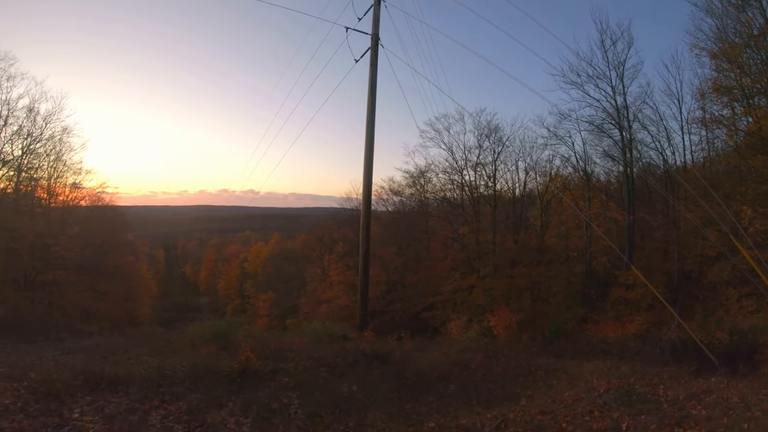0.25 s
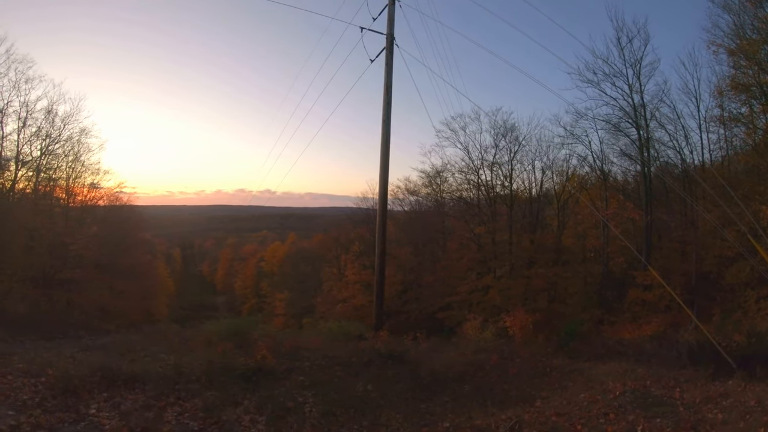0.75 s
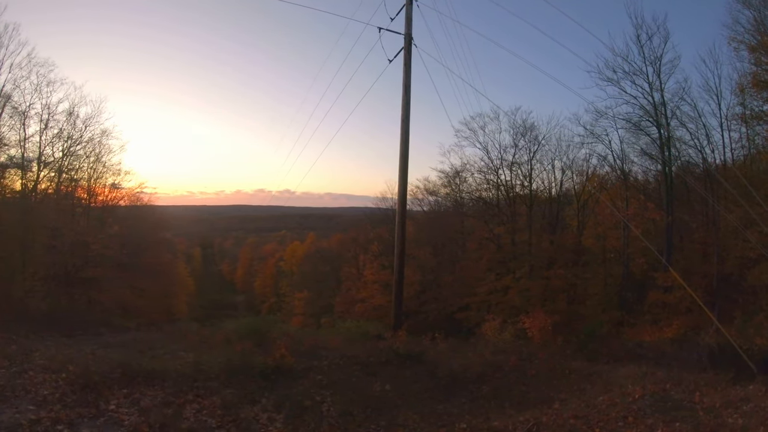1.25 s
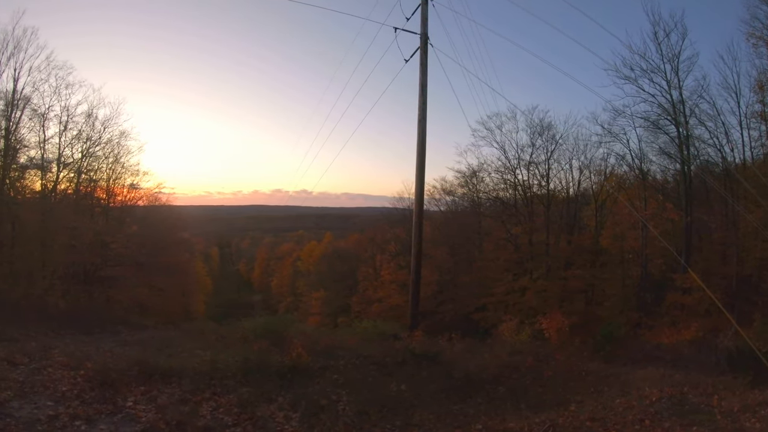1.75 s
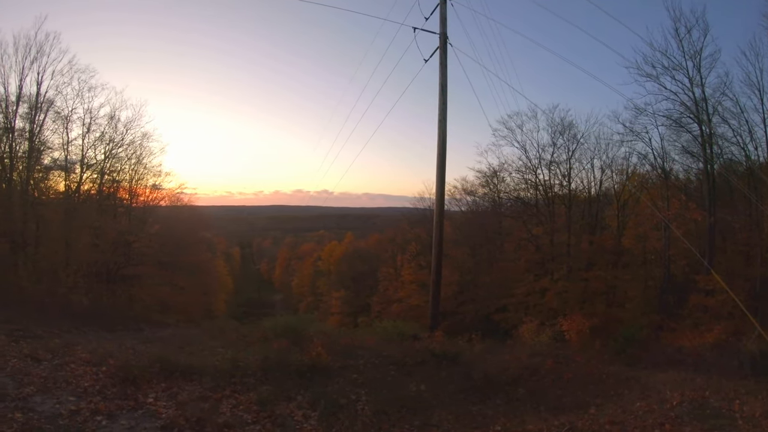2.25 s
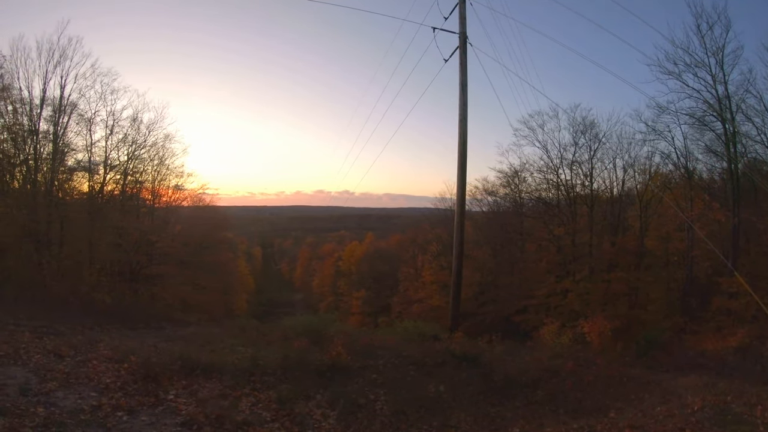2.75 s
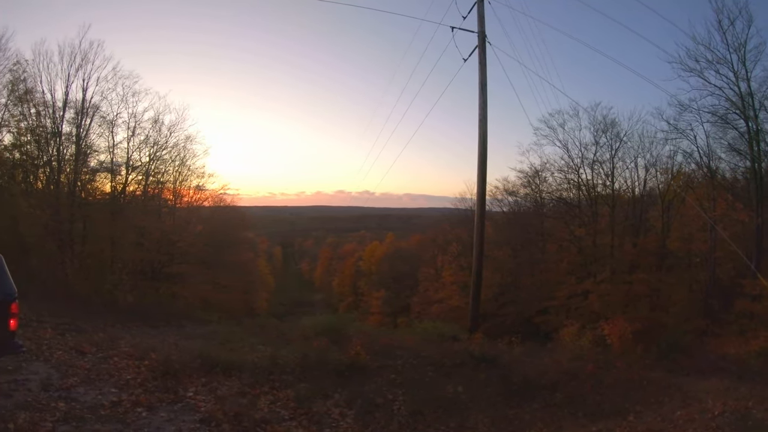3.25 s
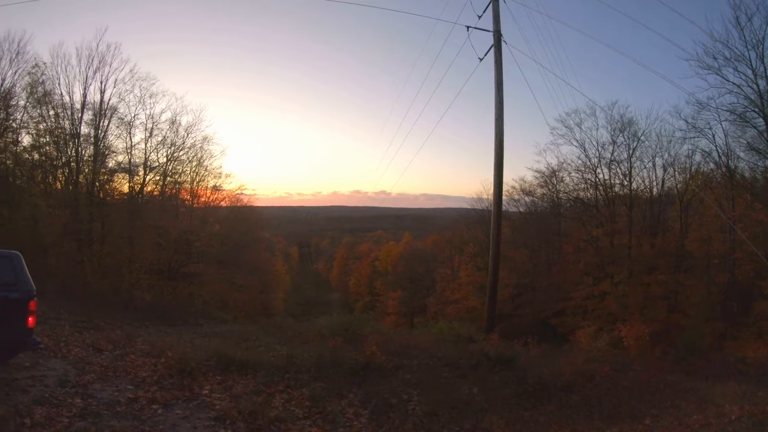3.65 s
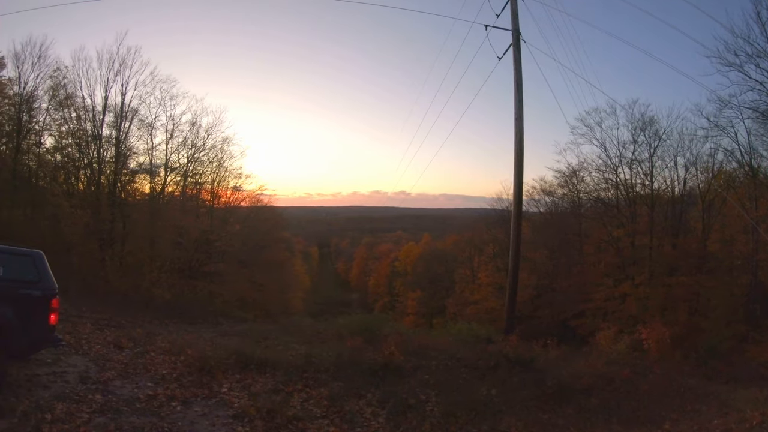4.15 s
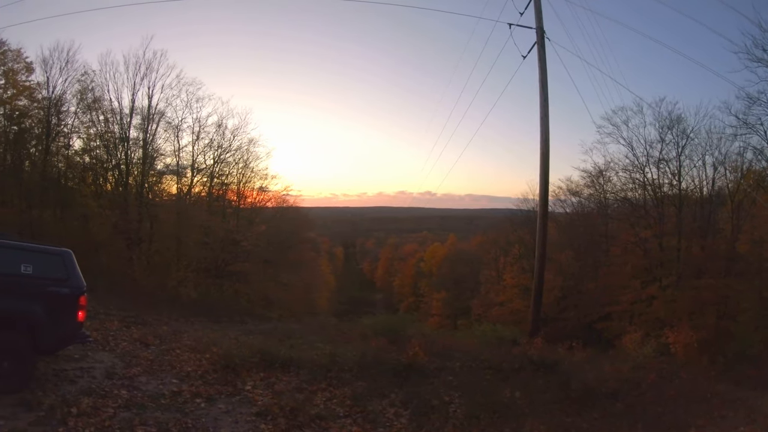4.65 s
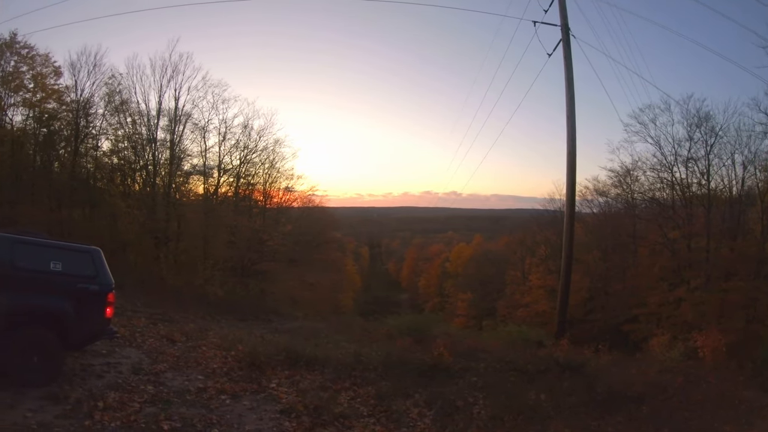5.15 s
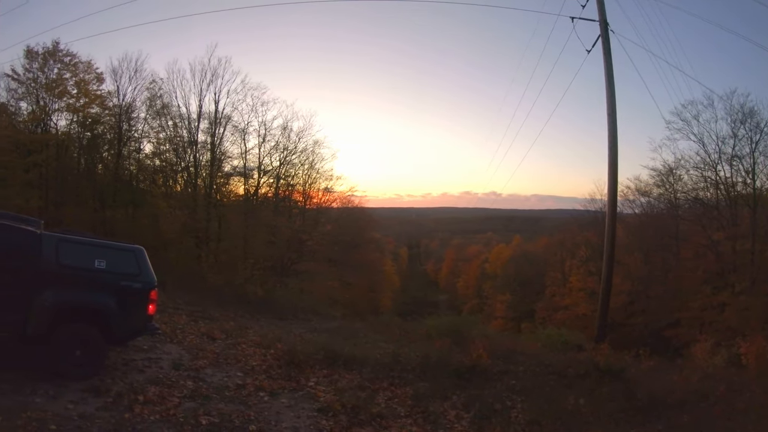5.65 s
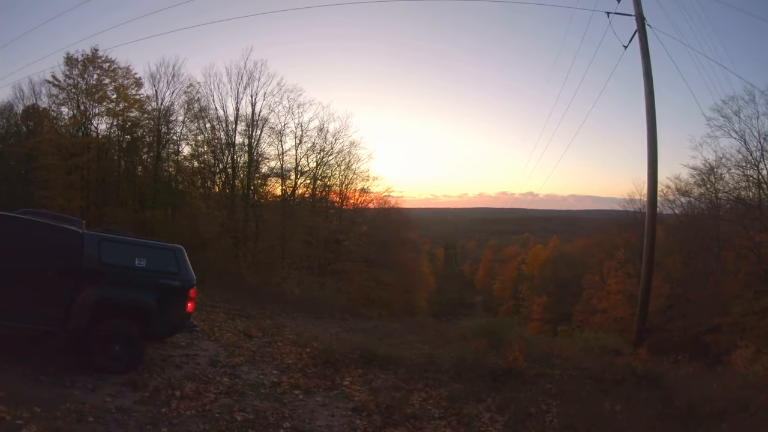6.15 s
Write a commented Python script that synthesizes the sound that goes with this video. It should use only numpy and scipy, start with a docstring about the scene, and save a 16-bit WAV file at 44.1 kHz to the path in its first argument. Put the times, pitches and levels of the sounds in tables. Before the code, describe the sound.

A parked pickup idles steadily in the open, its low exhaust thumping about fifteen times a second under a beating fan hum and faint airy hiss. A loose metal part chatters and knocks through the first four seconds, then mostly quiets. The handheld microphone catches soft wind rumble and dull handling bumps around 2.5 and 5.5 seconds.

```python
"""Idling V6 pickup outdoors

Harmonics of the crank rate sum to uneven exhaust thumps; harmonics of the fan rate beat as a hum.
Shaped noise gives the engine's rumble and wash and the intake hiss, with whistles from narrow resonators.
Random touches ring a loose metal part near 1 kHz, and harder knocks stand out from its chatter.
Light air and handling act on the hand-held microphone as rumble, gusts, soft bumps and sinking drones."""
import sys
import numpy as np
from scipy import signal
from scipy.fft import rfft, irfft
from scipy.io import wavfile

SR = 44100
rng = np.random.default_rng(int(sys.argv[2]) if len(sys.argv) > 2 else 0)


def store_pcm(level_fs):
    """Save levels as 16-bit WAV."""
    pcm = np.round(np.clip(level_fs, -1, 1) * 32767).astype(np.int16)
    wavfile.write(sys.argv[1], SR, np.atleast_2d(pcm).T)


N = 282240
T = np.arange(N) / SR  # time axis, s

# Crank rotation, hunting a little at idle: [t/s, crank rate/(turns per s)]
CRANK_RATE = [(0, 14.87), (.5, 14.93), (.9, 15.2), (1.35, 14.77), (2.45, 15.1), (3.15, 14.95), (3.47, 14.7),
              (3.9, 15.1), (5.65, 15.01), (6.4, 14.77)]
FIRST_THUMP_S = .056
# Exhaust harmonics, before the thump strength: [multiple of crank rate, rms level/dB]
EXHAUST_ORDERS = [(2, -62), (3, -61), (4, -63), (5, -51.3), (6, -49.8), (7, -54.2), (8, -50.5), (9, -56),
                  (10, -51.8), (11, -67), (12, -63), (13, -57.5), (14, -70)]
# Strength of the exhaust thumps: [t/s, relative level/dB]
THUMP_STRENGTH = [(0, -1), (1.6, -3.5), (2.0, -2.5), (2.4, -2.5), (3.0, -2.5), (3.55, -2.3), (4.3, -1),
                  (4.7, -2.3), (5.2, 1.2), (5.9, -0.8), (6.4, -2)]

# Harmonics of a fan with unevenly spaced blades, before the hum level: [multiple of fan rate, rms level/dB]
FAN_ORDERS = [(2, -60.5), (3, -60), (4, -62), (5, -57), (6, -56), (9, -65), (10, -64.5), (12, -69),
              (13, -51.3), (14, -52.4), (15, -68), (16, -72), (17, -70.5)]
PULLEY_RATIO = 1.167  # fan turns per crank turn
# Belt slip of the fan against the crank: [t/s, lead/turns of the fan]
FAN_LEAD_TURNS = [(0, .25), (.8, .35), (1.85, .39), (2.25, .37), (2.7, .41), (3.35, .355), (3.85, .365),
                  (4.95, .205), (5.8, .2), (6.4, .335)]
# Strength of the fan's hum: [t/s, relative level/dB]
FAN_HUM_LEVEL = [(0, -3.5), (1.1, -0.1), (3, -1.5), (4.6, 0), (5.5, -1.5), (6.4, 1)]
# Whines of the belt-driven accessories: [multiple of crank rate, rms level before flutter/dB]
ACCESSORY_WHINES = [(42, -74.5), (99.3, -84), (132.6, -100), (168.5, -94)]

# Noise spectrum of the engine block: [f/Hz, level/dB per Hz]
BLOCK_SPECTRUM = [(15, -82.5), (35, -78.5), (70, -72), (120, -70.5), (170, -70), (205, -73.5), (245, -73.5),
                  (285, -73.5), (330, -79.5), (400, -89), (600, -115)]
# Noise spectrum of the engine bay, before its throb: [f/Hz, level/dB per Hz]
BAY_SPECTRUM = [(250, -101), (400, -88.5), (500, -83), (620, -86.5), (830, -85), (950, -89), (1130, -88),
                (1330, -100.5), (1500, -96.5), (1900, -103), (2500, -108), (3500, -116), (6000, -135)]

# Noise spectrum of the intake hiss, before chopping and facing: [f/Hz, level/dB per Hz]
HISS_SPECTRUM = [(1500, -118), (2600, -113), (3550, -113), (3850, -105), (4200, -105.5), (4750, -105.5),
                 (5400, -112), (7000, -123), (8500, -124), (10000, -138), (12500, -131), (15000, -139)]
# Intake whistles, before wavering, chopping and facing: [f/Hz, bandwidth/Hz, rms level/dB]
INTAKE_WHISTLES = [(3707, 5, -88.7), (3771, 12, -86.3), (3812, 12, -90), (3862, 26, -83.8)]
CHOP_LEAD_TURNS = .19  # the hiss peaks just before each beat of the hum
DUCT_BAND_HZ = (3400, 5400)  # the band in which the intake duct resonates
# The hiss is directional and steps up by FACING_DB as the microphone turns to face the truck
FACING_S, TURN_S, FACING_DB = 3.1, 0.2, 1.0

# Modes of the loose metal part: [f/Hz, relative level/dB, decay time t60/s]
LOOSE_PART_MODES = [(813, -2, 0.025), (975, 0.5, 0.032), (1032, 2.5, 0.032), (1115, -1.5, 0.028),
                    (1500, -19.5, 0.06)]
# Bouts of chatter: [t at full level/s, hold length/s, level/dB]
CHATTER_BOUTS = [(0.464, 0.14, -55.5), (0.697, 0.41, -59), (1.314, 0.15, -58.5), (1.55, 0.052, -61),
                 (1.846, 0.46, -65.5), (2.403, 0.34, -61.5), (2.808, 0.44, -59), (3.342, 0.5, -57.5),
                 (3.996, 0.041, -59.5), (5.56, 0.15, -63.5)]
BOUT_ATTACK_S, BOUT_RELEASE_S = 0.012, 0.058
CHATTER_REST_DB = -67.5  # it never quite settles between bouts
# The shaking that bunches the chatter: multiples of the crank rate, and depth 0-1
SHAKE_ORDERS, SHAKE_DEPTH = (1.56, 2.68), .65
# Harder knocks of the loose part: [t half a rise before the peak/s, envelope peak level/dB, f/Hz]
HARD_KNOCKS = [(0.436, -45, 990), (0.466, -43.5, 1026), (0.508, -49, 1000), (0.671, -48, 1000),
               (.857, -56, 1030), (0.898, -50, 1005), (1.022, -45, 1070), (1.298, -47.5, 1030),
               (1.363, -45, 1050), (1.429, -54, 1030), (1.66, -45.5, 1035), (2.429, -47, 1040),
               (2.783, -48, 1080), (2.834, -45.5, 1000), (3.051, -42, 1000), (3.134, -46.5, 1070),
               (3.178, -39, 1020), (3.229, -50, 1040), (3.353, -47, 1025), (3.516, -48, 1024),
               (3.627, -51, 1040), (3.659, -47, 1060), (3.77, -46, 1060), (4.087, -51, 1010)]
# Noise colour of a knock's scuff: [f/Hz, relative level/dB per Hz]
SCUFF_COLOUR = [(450, -13), (650, 9.5), (1100, -1.5), (1350, -24.5), (2500, -32)]

# Soft bumps on the microphone housing: [t at the peak/s, peak level/dB, f/Hz, rise/cycles]
HOUSING_BUMPS = [(2.462, -33, 156, 0.58), (2.493, -35, 150, 0.85), (2.554, -28, 253, 1.34),
                 (2.556, -26, 91, 0.42), (2.565, -33.5, 330, .6), (2.572, -30, 68, 0.88),
                 (2.583, -29.5, 101, .7), (2.659, -35, 125, 0.46), (2.986, -32, 157, 0.82),
                 (5.357, -27.5, 165, 0.59), (5.417, -33, 280, 0.5), (5.425, -37, 230, 0.99),
                 (5.441, -29.5, 150, 0.73), (5.473, -32.5, 268, 1), (5.481, -33, 290, 0.51),
                 (5.507, -31.5, 280, 0.65), (5.515, -28, 90, 0.48), (5.53, -38, 160, 0.56),
                 (5.547, -37, 238, 1.0), (5.586, -35.5, 160, 0.85), (5.591, -34, 100, 0.92),
                 (5.861, -41, 110, 0.48), (5.886, -31.5, 121, 0.45)]
# Hollow drones after the big jolts: [t at full level/s, hold length/s, level/dB]
HOLLOW_DRONES = [(2.58, .28, -46.5), (5.539, .4, -48)]
DRONE_FROM_HZ, DRONE_TO_HZ, DRONE_SINK_S, DRONE_WIDTH_HZ = 255, 152, .13, 17.7

# Gusts on the microphone: [t at the peak/s, rise/s, fall/s, buffeting level/dB, deep rumble level/dB]
WIND_GUSTS = [(.45, 0.11, 0.25, -54, -50), (1.55, .2, 0.21, -52, -48), (2.23, 0.11, 0.074, -59, -42.5),
              (2.56, 0.093, 0.065, -51, -40), (2.79, 0.1, 0.15, -50.5, -57.5),
              (3.95, 0.26, 0.15, -51, -44.5), (5.43, 0.16, 0.14, -43, -54), (5.53, 0.078, .08, -47, -50.5),
              (5.86, 0.048, 0.45, -50.5, -50)]
# Colour of the deep air rumble: [f/Hz, relative level/dB per Hz]
RUMBLE_COLOUR = [(10, -15.5), (20, -3.5), (32, -1), (55, -0.5), (90, 1), (150, -7.5), (300, -43.5),
                 (600, -68)]
# Colour of the higher buffeting: [f/Hz, relative level/dB per Hz]
BUFFET_COLOUR = [(30, -13), (70, 3.5), (140, 3), (210, 4), (290, 0.5), (380, -18), (520, -22.5), (900, -48)]
BREEZE_DB, BREEZE_SWING_DB, BREEZE_SWINGS_PER_S = -51, 0, 1  # steady, as the swing is 0

CUTOFF_HZ = 15200


def from_db(db):
    """Decibel definition: 20 dB is a tenfold amplitude."""
    return 10 ** (np.asarray(db) / 20)


def rms_one(x):
    """Normalisation to unit root mean square."""
    return x / np.sqrt(np.mean(x ** 2) + 1e-20)


def in_time(rows):
    """Linear interpolation of each column at every sample."""
    s, *columns = np.transpose(rows)
    return [np.interp(T, s, c) for c in columns]


def drift(rate_hz):
    """Low-pass filtering of white noise: a slow random wander of unit rms."""
    hz = np.arange(N // 2 + 1) * SR / N
    spectrum = rfft(rng.standard_normal(N)) / (1 + (hz / rate_hz) ** 4)
    return rms_one(irfft(spectrum, N))


def noise(spectrum):
    """Spectral shaping of white noise to a level per Hz, falling away beyond the table's ends."""
    hz = np.maximum(np.arange(N // 2 + 1) * SR / N, 1)
    at, level = np.transpose(spectrum)
    ends = np.minimum(1, np.minimum(hz / at[0], at[-1] / hz)) ** 2
    gain = from_db(np.interp(np.log(hz), np.log(at), level)) * ends
    return irfft(rfft(rng.standard_normal(N)) * gain, N) * np.sqrt(SR / 2)


def ring(drive, hz, t60):
    """Damped resonance: a unit click sets a decaying sine of height 1 ringing."""
    radius = np.exp(-np.log(1000) / (t60 * SR))
    w = 2 * np.pi * hz / SR
    feedback = [1, -2 * radius * np.cos(w), radius * radius]
    return signal.lfilter([0, np.sin(w)], feedback, drive + 1e-18)


def swell(age, rise_s):
    """Soft contact: the envelope grows to 1 after rise_s, then dies away."""
    u = np.maximum(age, 0) / rise_s
    return (u * np.exp(1 - u)) ** 2


def bout(start, length, attack_s, release_s):
    """Amplitude envelope: a linear attack ending at start, a hold at 1, an exponential release."""
    attack = np.clip((T - start) / attack_s + 1, 0, 1)
    return attack * np.exp(-np.maximum(T - start - length, 0) / release_s)


def gust(peak_s, rise_s, fall_s):
    """Exponential growth and decay: the envelope builds to 1 and ebbs."""
    return np.exp(-np.maximum((peak_s - T) / rise_s, (T - peak_s) / fall_s))


def exhaust(turns, thump_db, uneven_db, jitter_turns, smear):
    """Fourier synthesis of one uneven thump a turn; the muffler's dispersion smears the outer orders."""
    angle = 2 * np.pi * (turns + jitter_turns * drift(19.0))
    main_order = 7
    pulses = 0
    for k, db in EXHAUST_ORDERS:
        phase = smear * (k - main_order) ** 2
        pulses = pulses + from_db(db) * np.cos(round(k) * angle + phase)
    return np.sqrt(2) * pulses * from_db(thump_db + uneven_db * drift(2.2))


def fan(fan_turns, flutter_db, smear):
    """Beating of blade tones: the two strongest orders interfere once a fan turn as a beaded hum."""
    hum_db, = in_time(FAN_HUM_LEVEL)
    main_order = 13.5
    angle = 2 * np.pi * fan_turns
    tones = 0
    for k, db in FAN_ORDERS:
        phase = smear * (k - main_order) ** 2
        tones = tones + from_db(db + flutter_db * drift(4)) * np.cos(round(k) * angle + phase)
    return np.sqrt(2) * tones * from_db(hum_db)


def whines(turns, flutter_db):
    """Geared rotation: faint accessory tones keep fixed ratios to the crank rate."""
    tones = 0
    for k, db in ACCESSORY_WHINES:
        tones = tones + from_db(db + flutter_db * drift(3.0)) * np.sin(2 * np.pi * k * turns)
    return np.sqrt(2) * tones


def engine_bay(turns, heave, throb, flicker_db):
    """Amplitude modulation: block rumble heaves once a turn, brighter wash throbs with its three firings."""
    firing = np.cos(2 * np.pi * 3 * turns)
    wash = noise(BAY_SPECTRUM) * (1 + throb * firing) * from_db(flicker_db * drift(54))
    rumble = noise(BLOCK_SPECTRUM) * (1 + heave * np.cos(2 * np.pi * turns))
    return rumble + wash


def ground_echo(x, lag_s, echo_db):
    """Comb filtering: one weak, late reflection off the ground ripples the spectrum."""
    return x + from_db(echo_db) * np.interp(T - lag_s, T, x, left=0)


def intake(fan_turns, throb, waver_db):
    """Turbulence at the nearly shut throttle: hiss and whistles, their duct band chopped by the fan."""
    whistles = 0
    for hz, width, db in INTAKE_WHISTLES:
        t60 = np.log(1000) / (np.pi * width)  # bandwidth sets the decay
        level = from_db(db + waver_db * drift(3))
        whistles = whistles + level * rms_one(ring(rng.standard_normal(N), hz, t60))
    angle = 2 * np.pi * (fan_turns + CHOP_LEAD_TURNS)
    blades = np.cos(angle) - .45 * np.cos(3 * angle) + .25 * np.cos(4 * angle)
    hiss = noise(HISS_SPECTRUM) + whistles
    duct = signal.butter(2, DUCT_BAND_HZ, "band", fs=SR, output="sos")
    resonance = signal.sosfiltfilt(duct, hiss)
    facing_db = FACING_DB / 2 * np.tanh((T - FACING_S) / TURN_S)
    return (hiss + resonance * throb * blades) * from_db(facing_db)


def chatter(turns, per_s, spread_db):
    """Modal excitation by random touches: engine shaking bunches them, each strikes the modes differently."""
    shake = np.prod([1 + SHAKE_DEPTH * np.cos(2 * np.pi * k * turns) for k in SHAKE_ORDERS], axis=0)
    struck = rng.random(N) < shake * per_s / SR
    touches = struck * from_db(spread_db * np.clip(rng.standard_normal(N), -2, 2))
    rings = 0
    for hz, db, t60 in LOOSE_PART_MODES:
        rings = rings + from_db(db) * ring(touches * rng.standard_normal(N), hz, t60)
    levels = [from_db(db) * bout(s, length, BOUT_ATTACK_S, BOUT_RELEASE_S)
              for s, length, db in CHATTER_BOUTS]
    return rms_one(rings) * np.hypot(np.max(levels, axis=0), from_db(CHATTER_REST_DB))


def knocks(rise_s, scuff_db):
    """Gradual excitation: harder touches build over a few cycles near the main mode, with a rough scuff."""
    scuff = from_db(scuff_db) * rms_one(noise(SCUFF_COLOUR))
    out = 0
    for s, db, hz in HARD_KNOCKS:
        envelope = from_db(db) * swell(T - s + rise_s / 2, rise_s)
        out = out + envelope * (np.sin(2 * np.pi * hz * (T - s)) + scuff)
    return out


def bumps():
    """Damped impulse response: hand bumps on the housing, crisp or dull, last a few cycles in clusters."""
    out = 0
    for s, db, hz, cycles in HOUSING_BUMPS:
        rise_s = cycles / hz
        out = out + from_db(db) * swell(T - s + rise_s, rise_s) * np.cos(2 * np.pi * hz * (T - s))
    return out


def drones(attack_s, release_s):
    """Quadrature modulation of a gliding carrier: a narrow band of rumble sinks and levels off."""
    out = 0
    for s, length, db in HOLLOW_DRONES:
        sink = np.exp(-np.maximum(T - s, 0) / DRONE_SINK_S)
        hz = DRONE_TO_HZ + (DRONE_FROM_HZ - DRONE_TO_HZ) * sink
        angle = 2 * np.pi * np.cumsum(hz) / SR
        band = rms_one(drift(DRONE_WIDTH_HZ) * np.cos(angle) + drift(DRONE_WIDTH_HZ) * np.sin(angle))
        out = out + from_db(db) * bout(s, length, attack_s, release_s) * band
    return out


def buffeting():
    """Wind turbulence at the microphone: gusts lift the breeze's deep rumble and add higher buffeting."""
    buffet, rumble = 0, 0
    for s, rise_s, fall_s, buffet_db, rumble_db in WIND_GUSTS:
        shape = gust(s, rise_s, fall_s)
        buffet = buffet + from_db(buffet_db) * shape
        rumble = rumble + from_db(rumble_db) * shape
    breeze = from_db(BREEZE_DB + BREEZE_SWING_DB * drift(BREEZE_SWINGS_PER_S))
    deep = rms_one(noise(RUMBLE_COLOUR)) * np.hypot(breeze, rumble)
    return deep + rms_one(noise(BUFFET_COLOUR)) * buffet


def scene():
    """Superposition: truck sounds share the crank's rotation; air and handling act on the microphone alone."""
    speed, = in_time(CRANK_RATE)
    thump_db, = in_time(THUMP_STRENGTH)
    lead, = in_time(FAN_LEAD_TURNS)
    turns = np.cumsum(speed) / SR - FIRST_THUMP_S * speed[0]
    fan_turns = PULLEY_RATIO * turns + lead
    thumps = exhaust(turns, thump_db, uneven_db=.75, jitter_turns=.003, smear=.04)
    tones = fan(fan_turns, flutter_db=1.0, smear=0.3104) + whines(turns, flutter_db=4.0)
    bay = engine_bay(turns, heave=0.014, throb=0.1, flicker_db=-0.13)
    bay = ground_echo(bay, lag_s=0.0058, echo_db=-23.5)
    hiss = intake(fan_turns, throb=.135, waver_db=1.5)
    # with a spread of 0 dB, only each mode's random share varies the touches
    rattle = chatter(turns, per_s=1300, spread_db=0.0) + knocks(rise_s=0.0046, scuff_db=-14.5)
    truck = thumps + tones + bay + hiss + rattle
    handling = bumps() + drones(attack_s=0.038, release_s=.05)
    return (truck + handling + buffeting())[None]


def record(dry):
    """Band limitation: a steep low-pass filter cuts the top."""
    low_pass = signal.cheby2(12, 60, CUTOFF_HZ, fs=SR, output="sos")
    return signal.sosfilt(low_pass, dry)


dry = scene()
out = record(dry)
store_pcm(out)
```